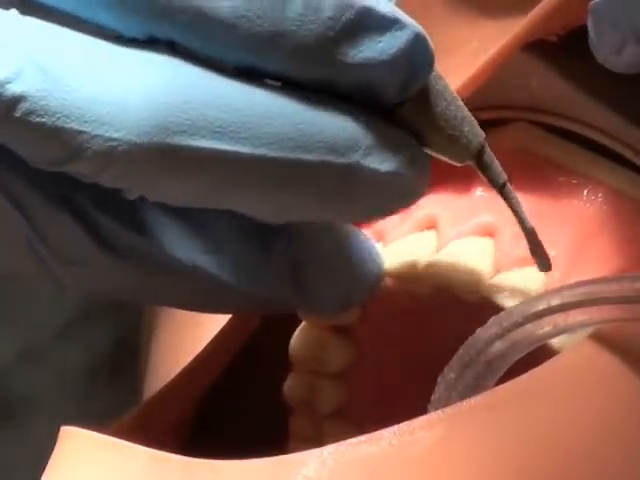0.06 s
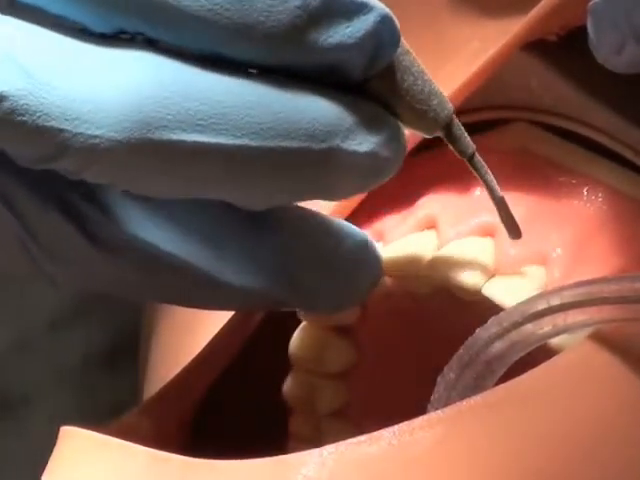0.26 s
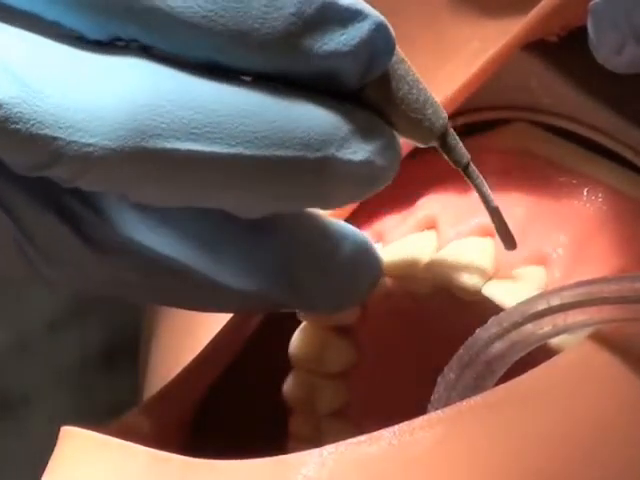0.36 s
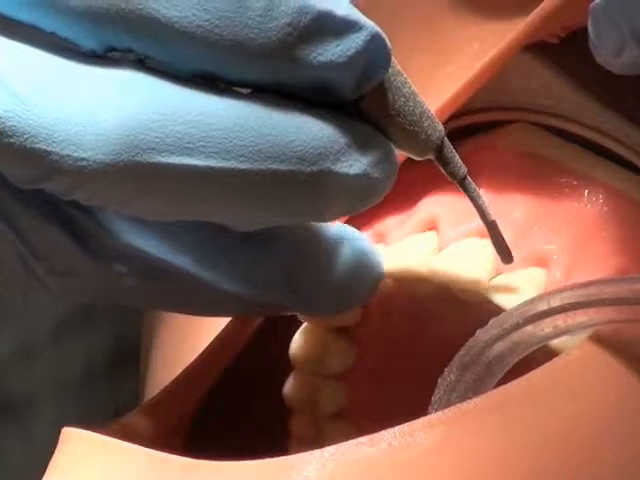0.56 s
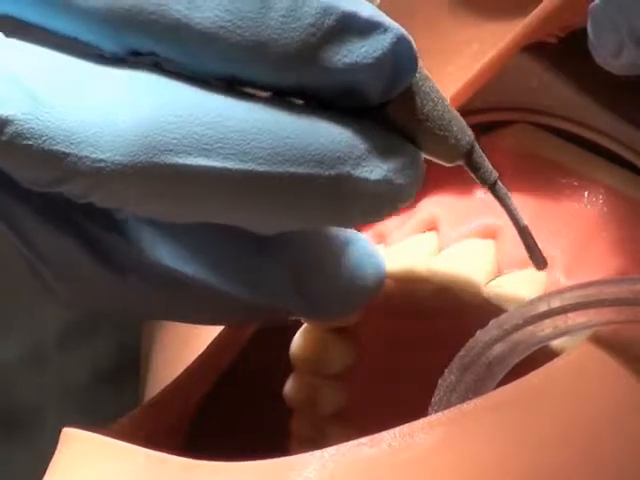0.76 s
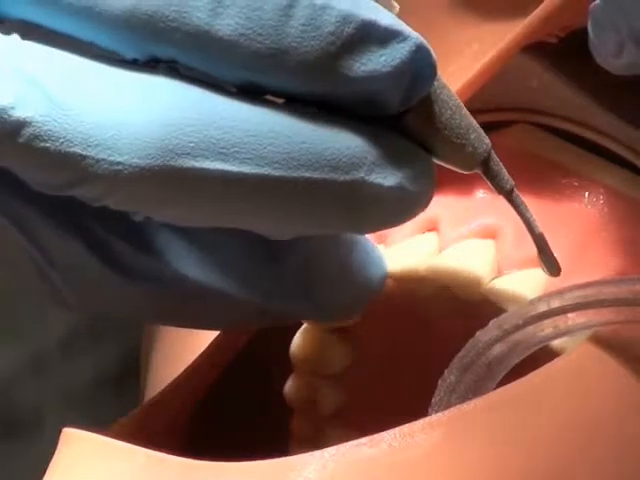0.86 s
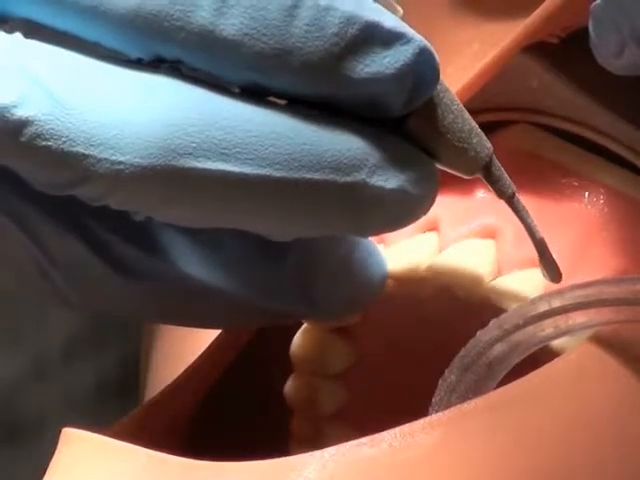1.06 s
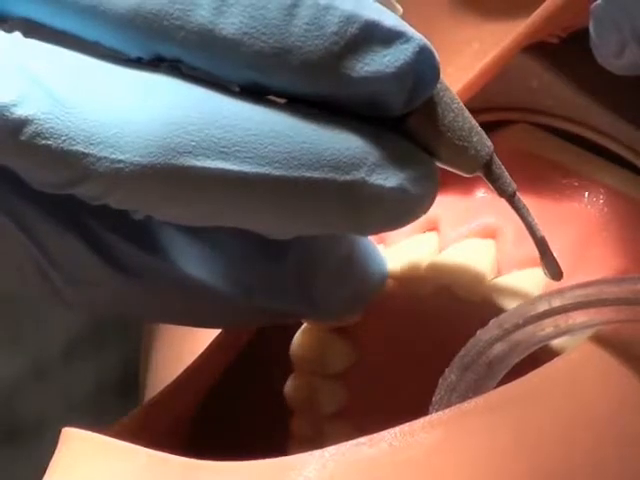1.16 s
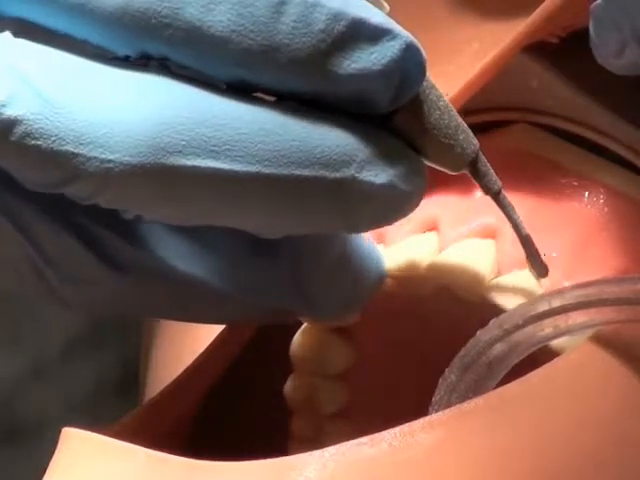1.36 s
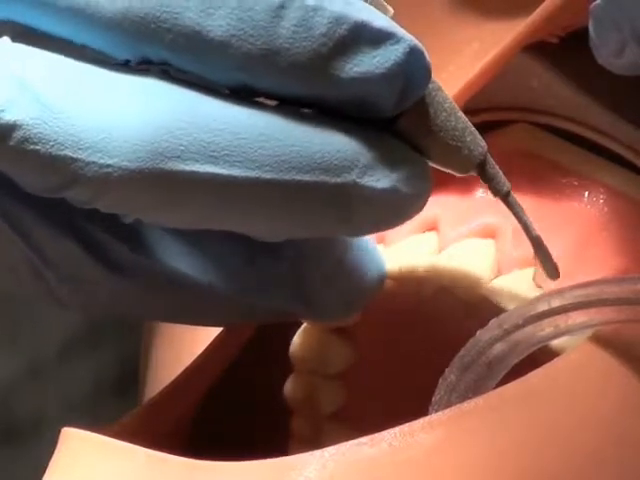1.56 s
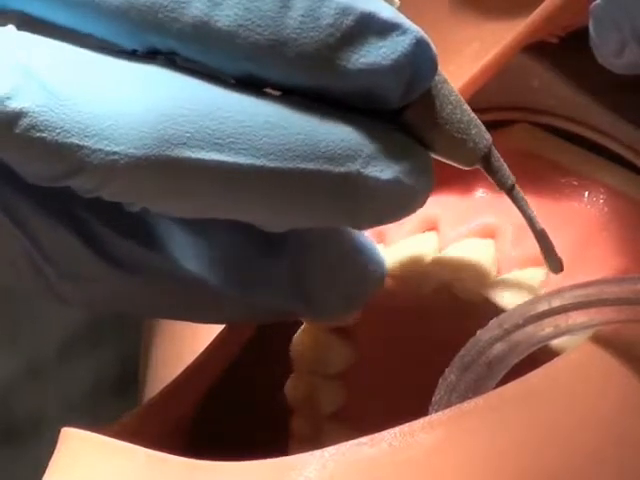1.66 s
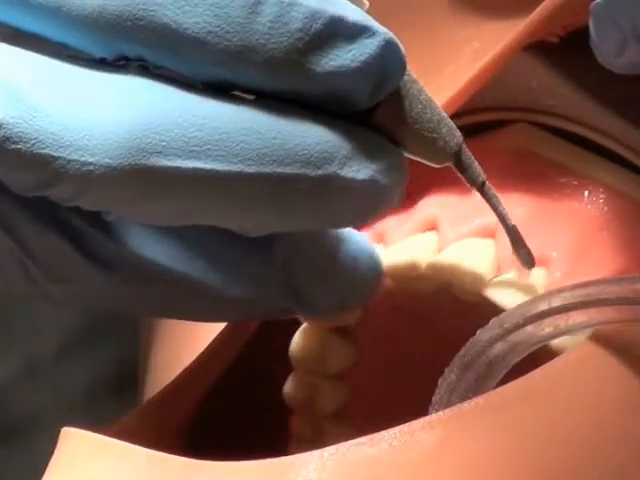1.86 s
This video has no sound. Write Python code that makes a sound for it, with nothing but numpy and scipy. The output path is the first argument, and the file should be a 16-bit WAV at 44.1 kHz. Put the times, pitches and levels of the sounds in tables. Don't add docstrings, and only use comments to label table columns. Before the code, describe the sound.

One loud airy jet from a dental handpiece, followed by small clicks, a squeak and a wet gurgle.

```python
import sys
import numpy as np
from scipy import signal
from scipy.fft import rfft, irfft
from scipy.io import wavfile

SR = 44100
rng = np.random.default_rng(int(sys.argv[2]) if len(sys.argv) > 2 else 0)


def voltage_ratio(decibels):
    exponent = np.asarray(decibels, float) / 20
    return 10 ** exponent


def pcm_store(signal):
    levels = np.round(np.clip(np.atleast_2d(signal), -1, 1) * 32767)
    wavfile.write(sys.argv[1], SR, levels.astype(np.int16).T)


N = 83790

# [t/s, level/dB]
FLOW = [
    (.2285, -60),
    (.231, -25),
    (.262, -27),
    (.292, -16),
    (.43, -16.5),
    (.58, -16.5),
    (.71, -16),
    (.8, -17.5),
    (1.0, -47.5),
]
# [f/Hz, density/dB]
JET_COLOUR = [(15, -49), (25, -14.5), (256, -18.5), (516, -15), (695, -17), (1740, -16), (3520, -12.5),
              (9840, 0), (16000, -12.5)]
# [f/Hz, width/Hz, level/dB]
MOUTH_MODES = [(1940, 830, 5), (4500, 460, 1), (6200, 600, 0.5), (6911, 259.8, -2), (7800, 1300, 3),
               (9800, 450, 2), (10340, 170, -5), (11207, 540, 1), (10800, 1100, -0.5), (12070, 870, -5.5),
               (12900, 489, 1)]
# [f/Hz, level/dB]
JET_SIDE = [(25, -13), (300, -14), (900, -17), (2500, -17), (5000, -13), (8000, -11), (9800, -15),
            (11500, -28)]
# [f/Hz, level/dB]
LEAN = [(60, -.5), (600, -.3), (2000, 0), (5000, -1.1), (8500, -.3), (10000, 0), (16000, 0)]
# [t/s, rise/s, fall t60/s, level/dB, f/Hz]
NOISE_SWELLS = [(0.456, 0.26, 0.21, -33.5, 1960), (0.257, 0.021, 0.91, -33, 4140), (0.7, 0.1, 0.7, -35, 3800),
                (1.15, 0.0038, 0.44, -44, 970), (1.65, 0.14, 0.55, -56, 1950), (1.0152, .0005, .04, -34, 4400),
                (1.0152, .0005, .04, -36, 6600), (1.15, .001, .05, -40, 4500), (1.118, .002, .3, -40, 4800),
                (1.476, .006, .07, -44, 5700), (1.826, .018, .3, -41, 5500)]
# [t/s, rise/s, fall t60/s, level/dB]
PUFFS = [
    (.145, 0.01021, 0.14, -40.5),
    (0.217, 0.0051, 0.0803, -39.5),
    (1.11, 0.001932, 1, -40.5),
    (1.465, 0.01275, 1, -45),
    (1.794, 0.0061, 0.14, -39.5),
    (1.82, 0.022, 0.4353, -42.5),
]
# [f/Hz, density/dB]
LEAK_COLOUR = [(500, -21), (1500, -5), (3000, -8), (5000, -4), (8500, -2.5), (11000, -7.5), (15000, -15)]
# [t/s, level/dB, rattle length/s]
OPEN = [
    (.229, -18, .003),
]
# [f/Hz, level/dB, t60/s]
OPEN_MODES = [(2050, -8, .02), (2450, -13, 0.017), (3730, -6, 0.027), (6000, -3, 0.014), (7200, 4, 0.0086),
              (8820, -1.5, 0.021)]
# [t/s, level/dB, rattle length/s]
CLOSE = [
    (1.1082, -31, .002),
    (1.1108, -16.5, .0015),
    (1.1132, -19, .0018),
    (1.116, -31, 0.006),
]
# [f/Hz, level/dB, t60/s]
CLOSE_MODES = [(600, -11, .025), (1000, -9, 0.025), (1580, -20, 0.02), (1850, -13, 0.025),
               (2400, -10, 0.012), (3500, -4, 0.0045), (4200, -1, 0.005), (4970, -7, 0.012),
               (7200, 3, 0.0046), (7800, -4, 0.006), (9400, -12, .006), (10640, -13, 0.006),
               (12200, -22, 0.0046), (14400, -22, 0.0031)]
# [t/s, level/dB, rattle length/s]
THUMPS = [
    (.2295, -17, .001),
    (.711, -18.5, .001),
    (.715, -19, .001),
]
# [f/Hz, level/dB, t60/s]
THUMP_MODES = [(340.8, -9, 0.025), (479, -5.5, 0.046), (874, 1.5, 0.013), (1033, -9, 0.035),
               (1260, -17, 0.01032)]
# [t/s, level/dB, rattle length/s]
TAPS = [
    (1.025, -27, .001),
    (1.016, -32, .001),
]
# [f/Hz, level/dB, t60/s]
TAP_MODES = [(870, 0, .03), (1060, -3, .025), (1300, -14, .015)]
# [t/s, level/dB, rattle length/s]
KNOCKS = [
    (1.149, -22, .001),
    (1.152, -27, .001),
    (1.159, -27, .001),
    (1.182, -33, .001),
]
# [f/Hz, level/dB, t60/s]
KNOCK_MODES = [(620, -6, .045), (900, -1, .03), (1090, -2, .028)]
# [t/s, level/dB, rattle length/s]
SNAPS = [
    (1.7985, -37, .001),
    (1.8022, -23, 0.0006),
    (1.8055, -30, 0.0006),
    (1.815, -36, 0.003),
    (1.839, -33, .0006),
]
# [f/Hz, level/dB, t60/s]
SNAP_MODES = [(4500, -3, 0.004), (5600, -2, 0.004), (7500, -1, .003), (9300, 0, 0.003), (10600, -2, .003),
              (13500, -16, .002)]
# [t/s, f/Hz, level/dB]
SQUEAK = [
    (1.463, 11800, -59.5),
    (1.465, 11340, -41),
    (1.4668, 8480, -39),
    (1.470, 6980, -40),
    (1.474, 6440, -39),
    (1.480, 5920, -41),
    (1.484, 6000, -40),
    (1.487, 6700, -45),
    (1.489, 7200, -72),
]
# [t/s, f/Hz, level/dB]
GURGLE = [
    (1.82, 6100, -64),
    (1.828, 5900, -49),
    (1.839, 5750, -48),
    (1.855, 5500, -47),
    (1.866, 5500, -50),
    (1.874, 5300, -49),
    (1.9, 5300, -57),
]
# [t/s, f/Hz, peak level/dB, width/s]
BUBBLES = [(1.826, 5900, -36, .0007), (1.828, 6100, -31, .0007), (1.8312, 6200, -35, .0008),
           (1.836, 5900, -29, .0006), (1.8394, 5700, -21.5, .0006), (1.8422, 5400, -33, .0005),
           (1.8478, 5600, -29, .0009), (1.8502, 5300, -29, .0006), (1.8525, 5100, -30, .0006),
           (1.856, 5500, -28, .0006), (1.859, 5700, -28, .0007), (1.8615, 5800, -33, .0006),
           (1.8680, 5700, -35, .0006), (1.8705, 5300, -31, .0007), (1.874, 5200, -30, .0009),
           (1.8775, 5700, -35, .0008), (1.889, 5500, -41, .001), (1.894, 5300, -41, .001)]
# [f/Hz, density/dB]
AIR_COLOUR = [(15, -52.5), (25, -14), (64, -2), (242, -5.5), (545, -14), (624, -15), (3430, -28),
              (5570, -18), (16000, -36)]
# [f/Hz, width/Hz, level/dB]
TUBE_MODES = [(2020, 190, 7.5), (3240, 680, 2.5), (5530, 900, -2), (8500, 1500, 4)]
# [f/Hz, level/dB]
AIR_SIDE = [(25, -28), (100, -22), (300, -13), (1500, -8), (4000, -9), (7800, -11), (8800, -20),
            (9600, -45)]


def jet():
    t, flow = np.arange(N) / SR, in_time(FLOW, 1)
    flow = flow - 119.5 * np.clip(t - FLOW[-1][0], 0, None)
    flow = flow - 200 * (t < FLOW[0][0])
    tilt = 0.12 * np.clip(flow + 17, -30, 0)
    return voltage_ratio(flow) * hiss(JET_COLOUR, MOUTH_MODES, JET_SIDE, patchy_db=0.86, flicker_db=0.12, tilt_db=tilt)


def hiss(spectrum, peaks, side, patchy_db, flicker_db, tilt_db=0):
    hz, t = np.fft.rfftfreq(N, 1 / SR), np.arange(N) / SR
    colour = at_hz(spectrum, hz)
    for f, width, db in peaks:
        colour = colour + db / (1 + (2 * (hz - f) / width) ** 2)
    reflect_t60_s, reflect_db = 0.12, -9
    echoes = rng.standard_normal(N) * voltage_ratio(-60 * t / reflect_t60_s)
    comb = 1 + voltage_ratio(reflect_db) * rfft(echoes) / np.sqrt(np.sum(echoes ** 2))
    mid, wide = rfft(rng.standard_normal((2, N))) * voltage_ratio(colour)
    mid = mid * comb
    lean = np.tanh(at_hz(LEAN, hz) * np.log(10) / 40)
    pair = np.array([mid, wide * voltage_ratio(at_hz(side, hz)) + mid * lean]) / np.std(irfft(mid, N))
    thirds = 3 * np.log2((hz + 1) / 20)
    together = flicker_db * drift(210)
    out = 0
    for k in range(31):
        band = np.clip(1 - np.abs(thirds - k), 0, 1)
        tilt = tilt_db * max(k / 3 - 26 / 3, -3)
        gain = voltage_ratio(together + patchy_db * drift(15.0) + tilt)
        centre, edge = irfft(pair * band, N) * gain
        out = out + np.array([centre, edge * voltage_ratio(2.5 * drift(0.94))])
    return np.array([out[0] + out[1], out[0] - out[1]])


def noise_swells():
    out = 0
    for start, rise, t60, db, hz in NOISE_SWELLS:
        octaves = 0.3 * np.sqrt(1850 / hz)
        edges = [hz * 2 ** -octaves, hz * 2 ** octaves]
        bandpass = signal.butter(2, edges, "band", fs=SR, output="sos")
        band = signal.sosfilt(bandpass, rng.standard_normal(N))
        out = out + swell(start, rise, t60, db) * rms_one(band)
    return out


def puffs():
    shape = sum(swell(*puff) for puff in PUFFS)
    return shape * hiss(LEAK_COLOUR, [], AIR_SIDE, patchy_db=1, flicker_db=1)


def valve():
    closing = struck(CLOSE, CLOSE_MODES, 4500)
    return struck(OPEN, OPEN_MODES, 1500) + soften(closing, 1, 11000)


def body_knocks():
    dull = struck(TAPS, TAP_MODES, 1) + struck(THUMPS, THUMP_MODES, 1) + struck(KNOCKS, KNOCK_MODES, 1)
    return soften(dull, 2, 1800)


def droplets():
    return struck(SNAPS, SNAP_MODES, 1200)


def struck(hits, modes, contacts_per_s):
    t, shape = np.arange(N) / SR, 0
    for start, db, length in hits:
        during = (t >= start) & (t < start + length)
        shape = shape + voltage_ratio(db) * during * (1 - 0.14 * (t - start) / length)
    starts = np.isin(np.arange(N), [int(start * SR) + 1 for start, _, _ in hits])
    contacts = (rng.random(N) < contacts_per_s / SR) | starts
    clicks = shape * contacts * rng.choice([-1, 1], N)
    out = np.zeros(N)
    for hz, db, t60 in modes:
        r, w = voltage_ratio(-60 / (t60 * SR)), 2 * np.pi * hz / SR
        drive = clicks * voltage_ratio(db - 8 + rng.normal(0, 2, N)) + 1e-18
        out += signal.lfilter([.5, 0, -.5], [1, -2 * r * np.cos(w), r * r], drive)
    return out


def squeak():
    level = in_time(SQUEAK, 2)
    phase = 2 * np.pi * np.cumsum(in_time(SQUEAK, 1) * (1 + .06 * drift(900))) / SR
    tone = np.sin(phase) + .4 * np.sin(1.27 * phase)
    return voltage_ratio(level + 2 + 4.0 * drift(800)) * tone * (level > -60)


def gurgle():
    bubbles_per_s, bubble_s, steady = 500, .0006, .4
    pops = (rng.random(N) < bubbles_per_s / SR) * voltage_ratio(4 * np.minimum(rng.exponential(1, N), 2))
    r = np.exp(-1 / (bubble_s * SR))
    gate = steady + rms_one(signal.lfilter([1], [1, -2 * r, r * r], pops))
    phase = 2 * np.pi * np.cumsum(in_time(GURGLE, 1) * (1 + .035 * drift(700))) / SR
    tone = np.sin(phase) + 0.24 * np.sin(.3 * phase) + 0.061 * np.sin(1.65 * phase)
    return voltage_ratio(in_time(GURGLE, 2)) * gate * tone * (np.arange(N) / SR > GURGLE[0][0])


def bubbles():
    t, out = np.arange(N) / SR, 0
    for centre, hz, db, width in BUBBLES:
        envelope = np.exp(-.5 * ((t - centre) / width) ** 2)
        out = out + voltage_ratio(db) * envelope * np.sin(2 * np.pi * hz * t)
    return out


def room(x):
    t60_s, level_db, first_echo_s = .25, -15, .004
    t = np.arange(int(.5 * SR)) / SR
    noise = soften(rng.standard_normal((2, len(t))), 1, 5200)
    mid, side = noise * voltage_ratio(-60 * t / t60_s) * (t > first_echo_s)
    tails = np.array([mid + .6 * side, mid - .6 * side]) / np.sqrt(np.sum(mid ** 2))
    return voltage_ratio(level_db) * signal.fftconvolve(x[None], tails, axes=1)[:, :N]


def suction_and_ventilation():
    return voltage_ratio(-42.5) * hiss(AIR_COLOUR, TUBE_MODES, AIR_SIDE, patchy_db=.7, flicker_db=.9)


def swell(start, rise, t60, db):
    t = np.arange(N) / SR
    decay_db = 60 * np.clip(t - start - rise, 0, None) / t60
    return voltage_ratio(db - decay_db) * np.clip((t - start) / rise, 0, 1)


def soften(x, order, hz):
    return signal.lfilter(*signal.butter(order, hz, fs=SR), x)


def drift(rate):
    r = np.exp(-2 * np.pi * rate / SR)
    slow = signal.lfilter([1], [1, -2 * r, r * r], rng.standard_normal(N + SR))[SR:]
    return rms_one(slow - slow.mean())


def rms_one(x):
    return x / np.sqrt(np.mean(x ** 2) + 1e-20)


def in_time(rows, column):
    rows = np.array(rows)
    return np.interp(np.arange(N) / SR, rows[:, 0], rows[:, column])


def at_hz(points, hz):
    points = np.array(points)
    return np.interp(np.log(hz + 1), np.log(points[:, 0]), points[:, 1])


def scene():
    small = valve() + body_knocks() + droplets() + squeak() + gurgle() + bubbles()
    lean = voltage_ratio(2.5 * np.array([[.5], [-.5]]))
    return jet() + noise_swells() + puffs() + small * lean + room(small) + suction_and_ventilation()


def roll_off(x):
    return signal.sosfilt(signal.butter(12, 16670, fs=SR, output="sos"), x)


def record(dry):
    lowpass = signal.ellip(12, .5, 70, 15700, fs=SR, output="sos")
    mix = signal.sosfilt(lowpass, dry)
    return roll_off(mix)


dry = scene()
out = record(dry)
pcm_store(out)
```